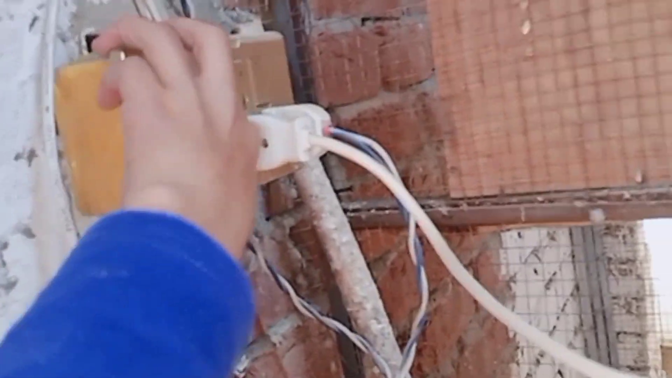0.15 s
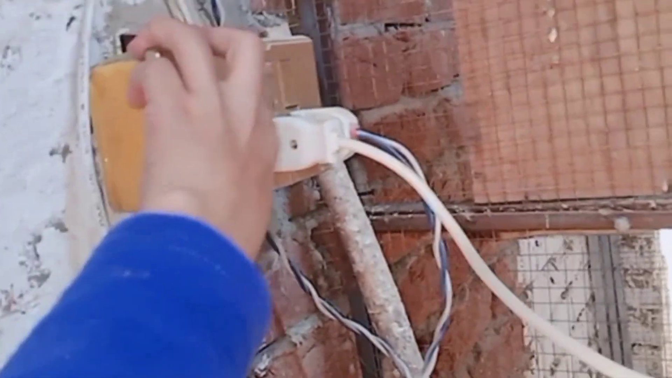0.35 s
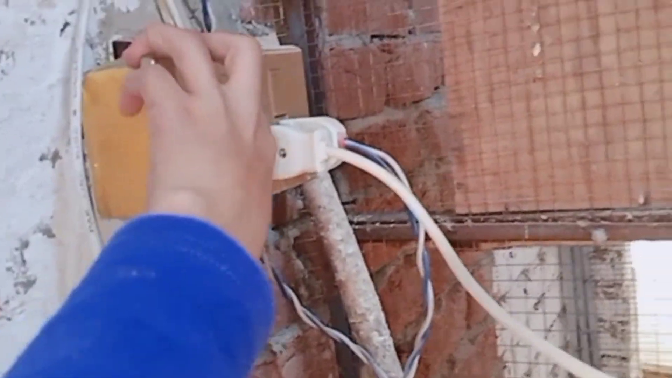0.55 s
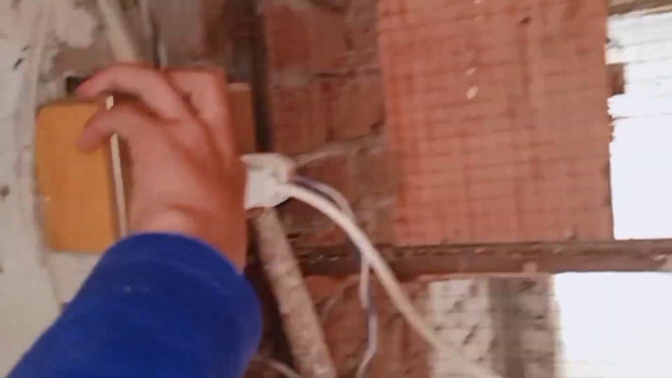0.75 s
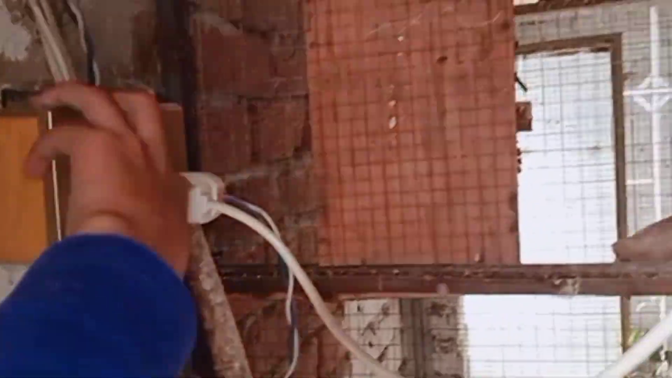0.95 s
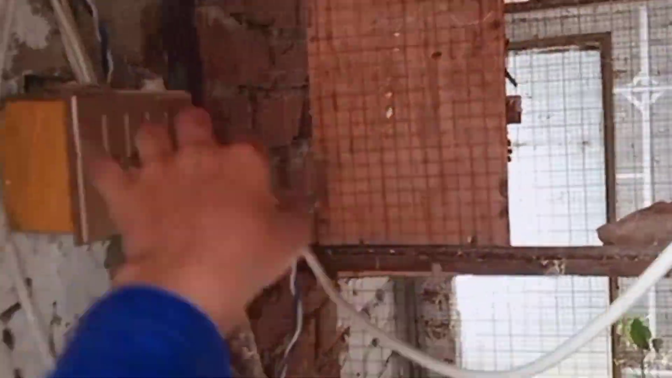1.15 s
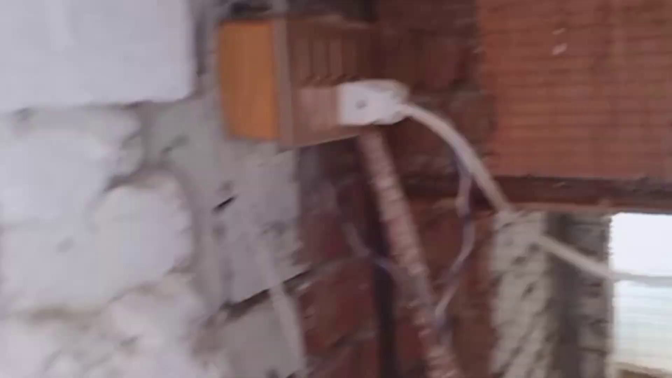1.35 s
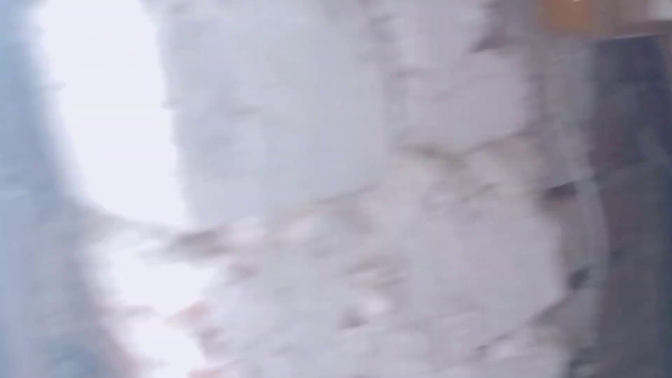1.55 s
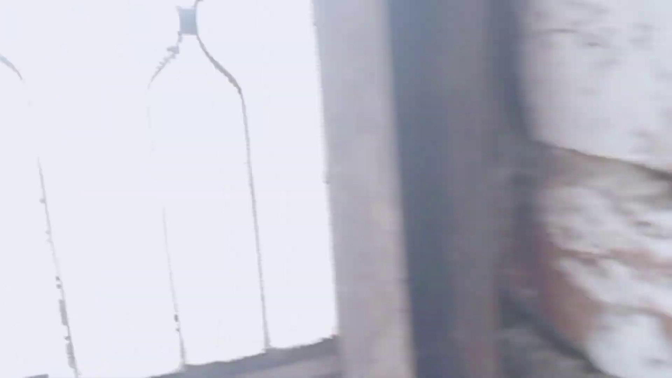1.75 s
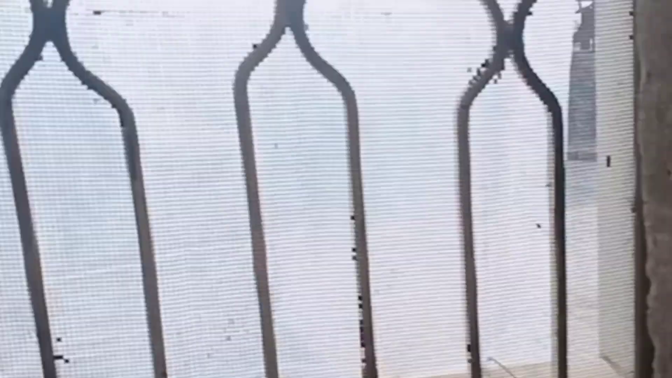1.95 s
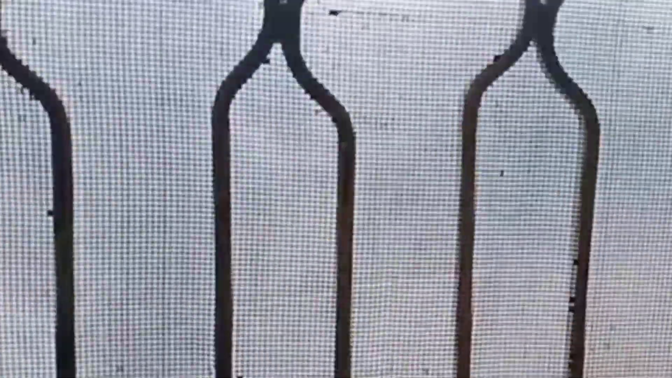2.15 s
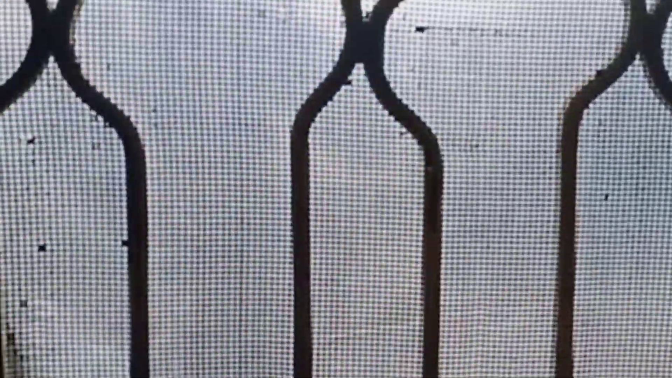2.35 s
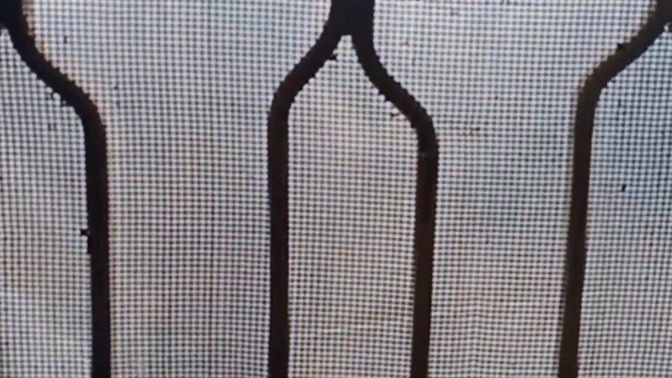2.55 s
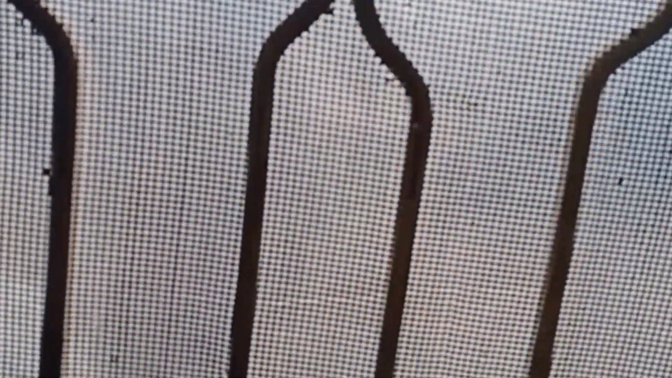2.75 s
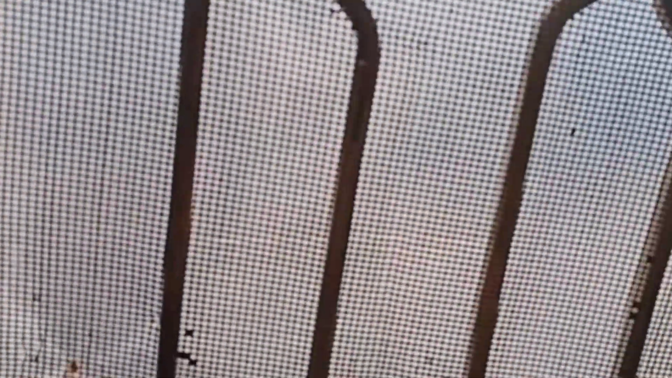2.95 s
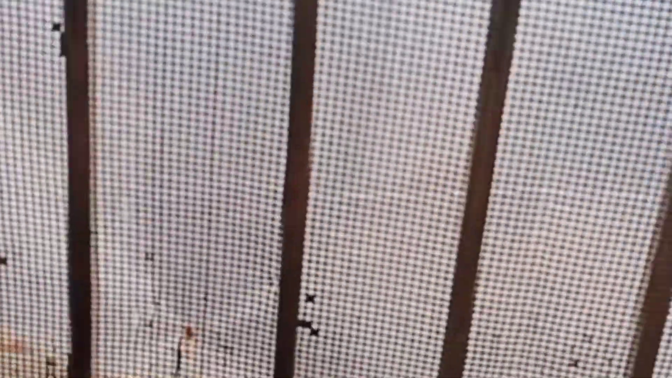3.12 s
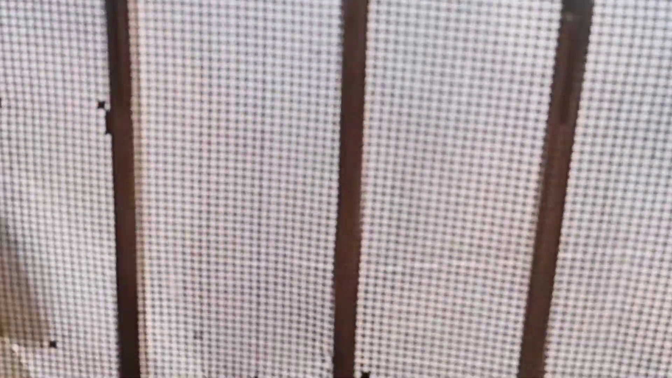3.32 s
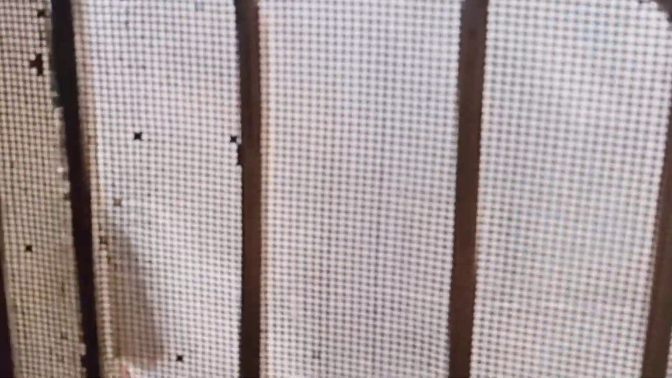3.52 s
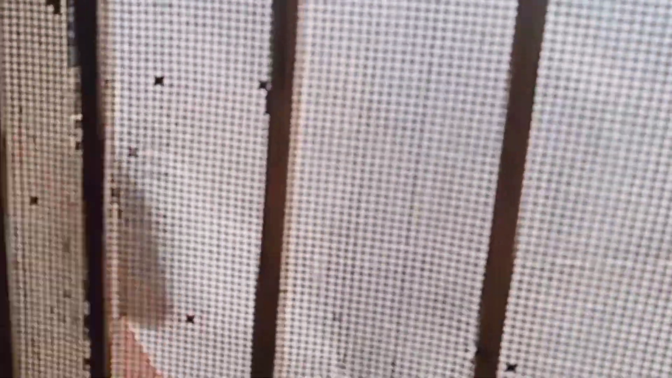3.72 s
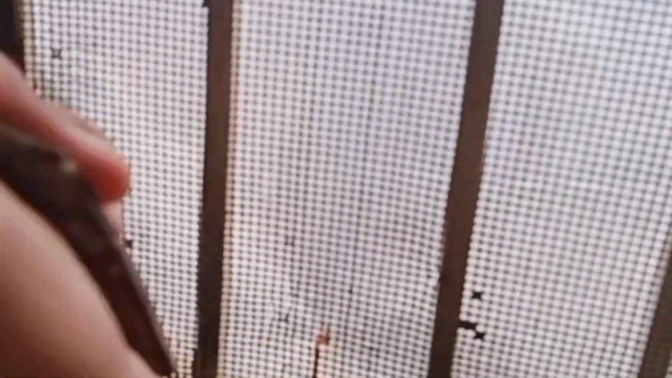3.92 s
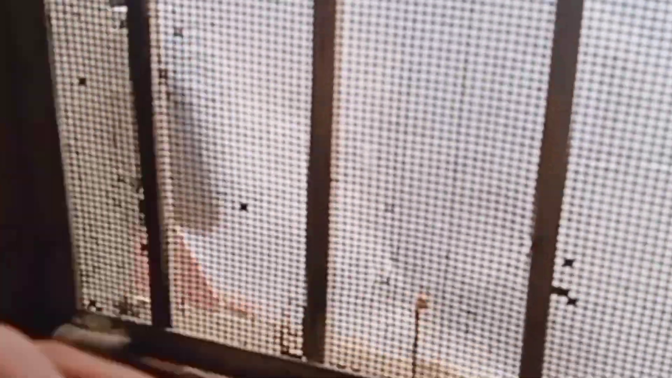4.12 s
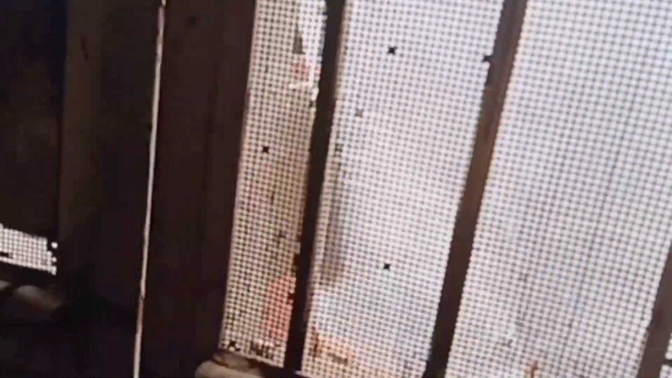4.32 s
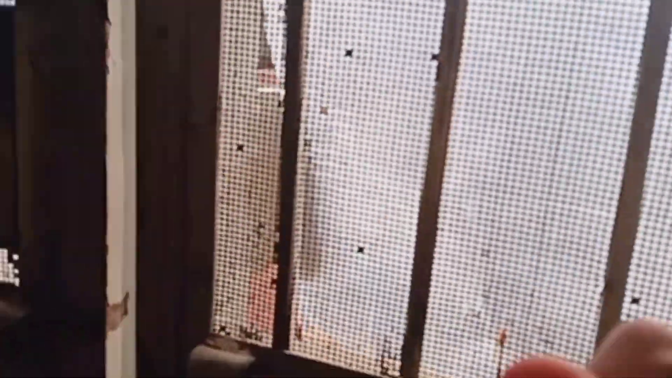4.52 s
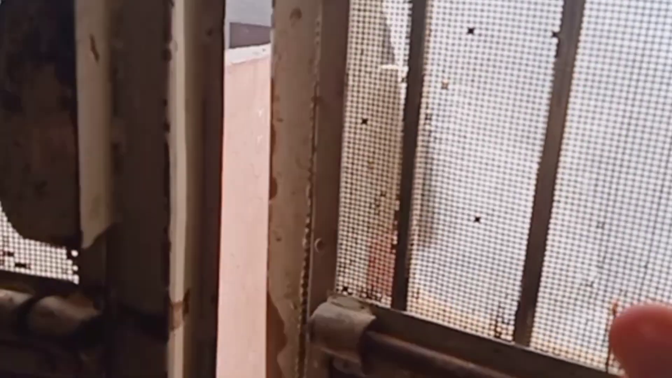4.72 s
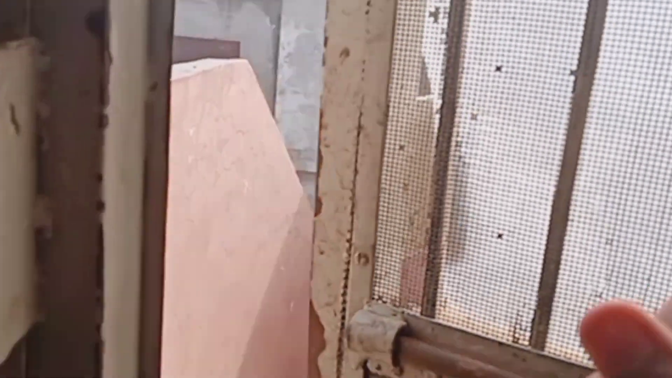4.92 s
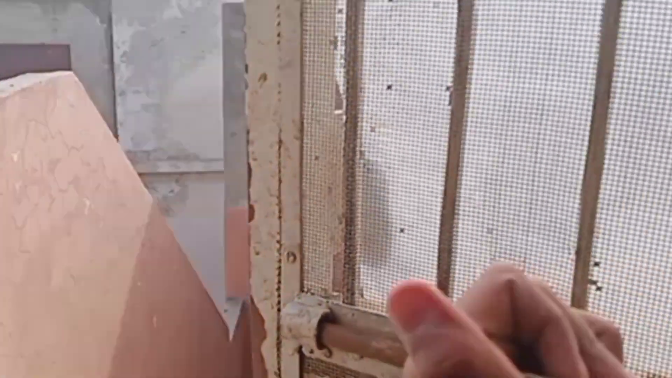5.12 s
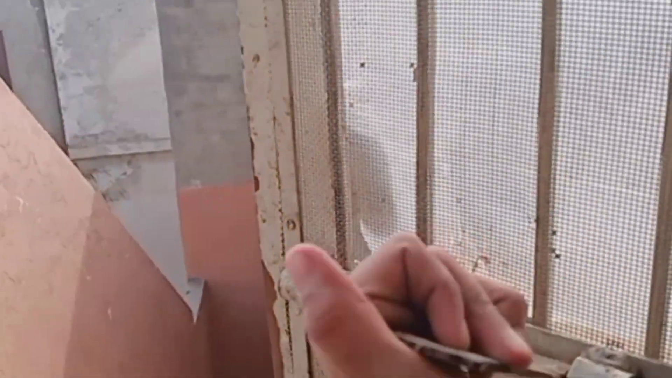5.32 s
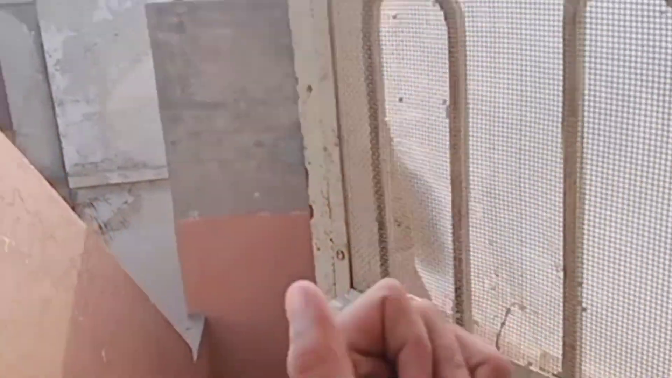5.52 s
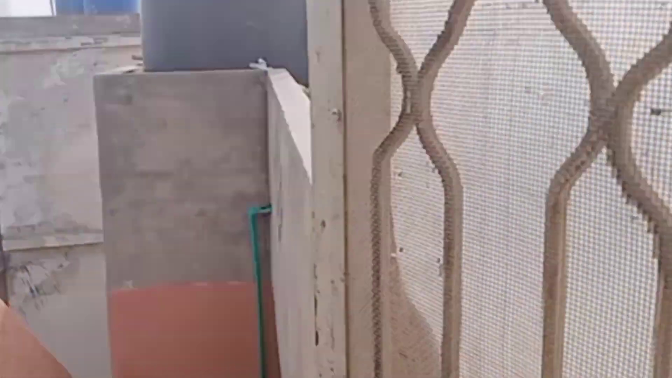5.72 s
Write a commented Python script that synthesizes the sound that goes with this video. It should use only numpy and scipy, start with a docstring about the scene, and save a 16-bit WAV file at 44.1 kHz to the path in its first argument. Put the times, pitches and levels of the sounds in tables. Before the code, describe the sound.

A quiet opening has dry plastic clicks, falling bird whistles and a faint squeak over distant town rumble. From the middle, rusty metal is jiggled right beside the phone: dense rattles, scrapes, dull thumps and shrill stick-slip squeaks with a short reflective echo. Rising hinge squeaks follow, then a thin sustained squeal and a weak low creak as the door settles.

```python
"""A rusty bolt is worked loose and an iron door swings open, heard close by with a phone in hand at a rooftop coop.
Dense rust clicks ring the iron as knocks and scrapes, after two switch snaps; decaying sines make the thumps.
Bolt and hinge squeak by stick-slip, as tones with overtones. Cloth and feathers rustle as faint filtered clicks.
Sparrows chirp as gliding whistles, and nearby walls echo. A low hum comes and goes in bursts over the town's
rumble and murmur, all three made of shaped noise."""
import sys
import numpy as np
from scipy import signal
from scipy.fft import rfft, irfft
from scipy.io import wavfile
from scipy.ndimage import uniform_filter1d

SR = 44100
rng = np.random.default_rng(int(sys.argv[2]) if len(sys.argv) > 2 else 0)


def int16_out(signal):
    """Quantize to a 16-bit WAV file."""
    q = np.round(np.clip(np.atleast_2d(signal).T, -1, 1) * 32767)
    wavfile.write(sys.argv[1], SR, q.astype(np.int16))


N = 258867
TIME = np.arange(N) / SR
PORT_LAG = 14  # samples by which sound reaches the left microphone port later
TOP_HZ = 15900  # upper edge of the phone's pickup


def undb(db):
    """Turn decibels into an amplitude factor."""
    return 10 ** (np.asarray(db) / 20)


def unit(x):
    """Scale to rms 1."""
    return x / np.sqrt(np.mean(x ** 2))


def band(x, hz, width_hz):
    """Resonance with gain 1 at its centre."""
    return signal.lfilter(*signal.iirpeak(hz, hz / width_hz, SR), x)


def double_band(x, hz, width_hz):
    """The same resonance passed twice, for steeper flanks."""
    return band(band(x, hz, width_hz), hz, width_hz)


def walk(rate, count):
    """Random levels held 1 / rate s and smoothed; spread near 1."""
    k = max(int(SR / rate), 2)
    held = np.repeat(rng.standard_normal(count // k + 1), k)
    return 1.28 * uniform_filter1d(held, k)[:count]


def ports(x, pan_db, lag=PORT_LAG):
    """Direct sound at the left and right microphone ports; lag in samples delays the left."""
    left = np.roll(x, lag) * undb(pan_db / 2)
    right = x * undb(-pan_db / 2)
    return np.array([left, right])


def walls(x):
    """Near walls: a short, dense, decaying echo, unrelated at the two ports."""
    t60_s, echo_db = .13, -0.5
    t = TIME[:SR // 2]
    onset = np.minimum(t / 0.00043, 1)
    tail = rng.standard_normal((2, len(t))) * undb(-60 * t / t60_s) * onset
    tail /= np.sqrt(np.sum(tail ** 2, axis=1, keepdims=True))
    return undb(echo_db) * signal.fftconvolve(x, tail, axes=1)[:, :N]


def town_and_hum():
    """A low hum in bursts over the town's rumble and murmur, whose treble is less alike at the two ports."""
    # course of the low hum, rumble and murmur: (time [s], hum level [dB], rumble level [dB], murmur level [dB])
    course = [(0.0, -71, -66.5, -54), (0.73, -67.5, -49.5, -61.5), (1.67, -62.5, -63, -59.5),
              (2.6, -36.5, -48.5, -53.5), (2.91, -70, -57, -58), (3.06, -40, -36, -42),
              (3.24, -51.5, -54.5, -56.5), (3.64, -29, -36.5, -44.5), (3.74, -46, -45.5, -44),
              (3.89, -33, -64, -47.5), (4.12, -48, -53, -59), (4.22, -38, -43.5, -60), (4.3, -71, -55, -38),
              (4.45, -32.5, -28, -59.5), (4.76, -28.5, -49, -47.5), (4.97, -41.5, -50.5, -54),
              (5.4, -31, -42.5, -62), (5.87, -41, -38.5, -45)]
    # relative noise spectrum of rumble and murmur: (frequency [Hz], level [dB])
    spectrum = [(18, -48), (30, -21), (98, 16), (394, -3.5), (512, -1), (616, -14.5), (1130, -18.5),
                (2480, -20), (5040, -43.5), (7470, -20), (8980, -44), (13700, -50), (16000, -54)]
    hum_hz, hum_width_hz = 97, 11
    patchy_db = 5  # each band of the murmur wavers on its own
    s, *columns = np.transpose(course)
    hum_db, rumble_db, murmur_db = (np.interp(TIME, s, c) for c in columns)

    hz = np.maximum(np.fft.rfftfreq(N, 1 / SR), 1)
    spectrum_hz, spectrum_db = np.transpose(spectrum)
    colour = undb(np.interp(np.log(hz), np.log(spectrum_hz), spectrum_db))
    side_width = np.clip(hz / 620.0, .6, 1)
    mid, side = (rfft(rng.standard_normal(N)) * colour * w for w in (1, side_width))
    pair = mid + side * np.array([[1], [-1]])
    low = 1 / (1 + (hz / 350) ** 4)  # splits rumble from murmur

    rumble_flicker_db, murmur_flicker_db = [3 * walk(10, count=N) for _ in range(2)]
    rumble = unit(irfft(pair * low / (1 + (125 / hz) ** 2), N))
    rumble = rumble * undb(rumble_db + rumble_flicker_db + np.array([[-4.0], [3.0]]))

    murmur = np.zeros((2, N))
    for centre_hz in 350 * 2 ** np.arange(0, 5.5, .4):
        bell = np.exp(-(np.log2(hz / centre_hz) / .3) ** 2)
        murmur += irfft(pair * (1 - low) * bell, N) * undb(patchy_db * walk(14, count=N))
    murmur = unit(murmur) * undb(murmur_db + murmur_flicker_db + 5.0)

    hum = band(rng.standard_normal(N), hum_hz, hum_width_hz)
    hum = unit(band(hum, hum_hz, 4 * hum_width_hz))
    return rumble + murmur + hum * undb(hum_db + np.array([[-3.5], [2.0]]))


def sparrows():
    """Short, mostly falling whistles, a little hoarse from a trembling pitch, with a weak octave."""
    # chirps: (time [s], length [s], start pitch [Hz], end pitch [Hz], level [dB])
    chirps = [(0.282, 0.057, 2750, 2035, -49), (0.13, 0.069, 2890, 2515, -43),
              (0.451, 0.081, 1856, 1795, -47), (0.324, 0.016, 3030, 2920, -40.5),
              (0.59, 0.15, 2140, 2170, -39), (1.048, 0.019, 2520, 2440, -46.5),
              (1.131, 0.038, 3020, 2050, -41), (1.132, 0.042, 4200, 3780, -40.5),
              (1.169, 0.088, 3594, 2476, -38), (1.301, 0.061, 3005, 2640, -38.5),
              (1.621, 0.046, 2270, 2150, -46.5), (1.695, 0.05, 2495, 2680, -47.5),
              (1.881, 0.056, 2480, 2463, -42.5), (2.01, 0.046, 3640, 2430, -55.5),
              (2.148, 0.073, 3260, 2280, -49.5)]
    out = np.zeros(N)
    for s, length, start_hz, end_hz, db in chirps:
        i, n = int(s * SR), int(length * SR)
        x = np.arange(n) / n
        hz = (start_hz + (end_hz - start_hz) * x) * (1 + .035 * walk(500, count=n))
        phase = 2 * np.pi * np.cumsum(hz) / SR
        swell = np.sin(np.pi * x ** 0.57)  # peaks before the middle
        out[i:i + n] += undb(db) * swell * (np.sin(phase) + 0.18 * np.sin(2 * phase))
    return ports(out, 0)


def grit(spread_db):
    """Dense rust clicks of very uneven size, coming in clumps."""
    size = np.minimum(rng.exponential(size=N), 7)
    return unit(rng.standard_normal(N) * undb(spread_db * size + 2.5 * walk(250, count=N)))


def iron(clicks):
    """Clicks ring the door: low body, lower frame, upper frame and bright grit, each at rms 1."""
    # resonances of the iron door: (frequency [Hz], half-width [Hz], relative level [dB])
    resonances = [(704, 420, 0.5), (2140, 108, 7), (2541, 194, 0), (2700, 64, 7), (3890, 560, -3),
                  (4520, 1520, -3), (7164, 690, -5.5), (7640, 1730, -9.5), (11680, 3220, 0)]
    # the contact wanders, so every resonance swells and fades on its own
    sway_db = 2.5
    rung = []
    for hz, half_width_hz, db in resonances:
        level = undb(db + sway_db * walk(60, count=N))
        rung.append(level * double_band(clicks, hz, 2 * half_width_hz))
    return [unit(sum(part)) for part in (rung[:2], rung[2:6], rung[6:8], rung[8:])]


def rustle():
    """Cloth and feathers rustle faintly near the phone: clicks through the three brighter parts."""
    # course of the rustle: (time [s], level [dB])
    rustle_levels = [(0, -80), (.5, -65), (.83, -36), (.95, -53), (1.27, -43), (1.4, -47), (1.44, -85.5),
                     (1.82, -56.5), (1.97, -56), (2.22, -54.5), (2.3, -32), (2.48, -39.5), (2.52, -79),
                     (2.74, -58), (2.8, -40), (2.83, -99)]
    _, frame, upper, top = iron(grit(spread_db=6.0))
    level = undb(np.interp(TIME, *np.transpose(rustle_levels)) + 4.3 * walk(12, count=N))
    return ports(level * (upper + undb(-6.0) * frame + undb(-11.5) * top), 0)


def thumps():
    """The door thumps: decaying sines, stronger at the right port."""
    # thumps: (time [s], level [dB], pitch [Hz], time to fall by 60 dB [s])
    thump_table = [(.394, -41, 875, 0.13), (3.559, -9.5, 161, 0.038), (4.09, -33.5, 183, 0.046),
                   (4.336, -20.5, 303, 0.043), (4.523, -20, 106, 0.05)]
    out = np.zeros((2, N))
    for s, db, hz, t60 in thump_table:
        i = int(s * SR)
        t = TIME[:SR // 4]
        thump = undb(db - 60 * t / max(t60, .01)) * np.sin(2 * np.pi * hz * t)
        out[:, i:i + len(t)] += ports(thump, -10.0)
    return out


def knocks():
    """Each contact swells, holds and dies away through the door, coloured by the spot that is touched."""
    # snaps, knocks and rust scrapes: (time [s], rise [s], hold [s], time to fall by 60 dB [s],
    # level [dB], brightness [dB], contact ring [Hz])
    contacts = [(.094, 0.00082, .001, 0.066, -27.5, 6, 1700),
                (.648, 0.00037, 0.0016, 0.021, -25.5, 6, 1640), (0.752, 0.012, 0.11, 0.13, -34, 6, 4580),
                (1.376, 0.0081, 0.0097, .15, -39, -4.5, 3030),
                (2.264, 0.083, 0.024, 0.094, -24.5, -6.5, 1874), (2.413, .0025, 0.041, 0.1, -63, 13, 6860),
                (2.453, 0.0023, 0.0063, 0.032, -40.5, 1, 7400),
                (2.653, 0.002, 0.0031, 0.26, -39.5, -2.5, 3560), (2.8, 0.0013, 0.029, 0.22, -36, 10, 2390),
                (2.83, 0.0034, 0.058, 0.26, -22.5, 0, 3170), (2.952, 0.027, 0.012, 0.18, -21, -7.5, 2410),
                (2.981, 0.0015, 0.0086, 0.048, -20.5, 5.5, 2490),
                (3.012, 0.00071, 0.0064, .13, -16.5, -5, 3610),
                (3.085, 0.013, 0.085, 0.062, -32.5, -1.5, 3200),
                (3.213, 0.00088, 0.019, 0.073, -20.5, 0, 3840), (3.261, .004, 0.02, 0.13, -47, -11.5, 8300),
                (3.332, 0.011, 0.038, 0.11, -36, -1, 7600), (3.393, 0.013, 0.021, 0.15, -30.5, -8, 2220),
                (3.475, 0.00091, 0.012, 0.69, -36, -1.5, 3180),
                (3.614, 0.0021, 0.0038, 0.19, -22, -1.5, 3460),
                (3.764, 0.0034, .003, 0.044, -32.5, -6, 4160),
                (3.793, 0.0029, 0.0076, 0.015, -30.5, -4.5, 2690),
                (3.91, 0.0034, 0.029, 0.21, -29.5, -0.5, 3650),
                (4.058, .0016, 0.018, 0.14, -39, -2.5, 7260), (4.13, 0.012, .009, 0.033, -19, 4.5, 3010),
                (4.171, .0045, .012, 0.26, -26, -6, 2540), (4.222, 0.011, 0.017, 0.054, -20, 4.5, 3920),
                (4.27, .002, 0.0042, 0.088, -20, -3, 3130), (4.299, 0.026, 0.031, 0.056, -22, 4, 2500),
                (4.335, 0.0015, 0.037, 0.59, -22, -7, 1310),
                (4.435, 0.016, 0.0059, 0.024, -25.5, 7.5, 4200),
                (4.576, 0.0023, 0.0044, 0.017, -48.5, 9.5, 3070),
                (4.768, 0.0039, 0.056, 0.32, -44, 3.5, 3970), (4.823, 0.015, 0.025, 0.18, -33, 11, 4400),
                (4.87, 0.018, 0.0088, .21, -28, 2.5, 4650),
                (5.047, 0.00096, 0.0008, 0.014, -34.5, -5, 1970),
                (5.099, 0.04, 0.013, 0.26, -27.5, 3.5, 4060), (5.206, 0.03, 0.021, 0.21, -24.5, 5.5, 5350),
                (5.312, 0.0077, 0.011, 0.21, -26.5, 4, 5380), (5.44, 0.032, 0.024, 0.23, -35, 6, 4750),
                (5.788, .067, .055, .1, -39, -2, 2280)]
    # body, frame, upper frame, grit: level, and dB gained per dB of brightness
    part_db, part_slope = np.array([-14.5, -1, -3, -9]), np.array([-1.72, 0.23, 0.99, 1.2])
    # narrow rings scattered around the touched spot: level, scatter of log pitch, width as share of pitch
    rasp_db, rasp_spread, rasp_width = 1.5, 0.4455, 0.027
    # a contact starts with a bare tick, weaker the slower it rises
    tick_db, tick_s, sharp_s = 24, .0005, .002
    stutter_db = 3.5  # rust catches and lets go within a scrape

    clicks = grit(spread_db=3.8)
    # the door is wide: its four parts reach the ports with different lags
    parts = [ports(part, 0, lag) for part, lag in zip(iron(clicks), (20, 12, 17, 9))]
    out = np.zeros((2, N))
    scatter = np.exp(rasp_spread * np.clip(rng.standard_normal((len(contacts), 6)), -2, 1.5))
    for (s, rise, hold, t60, db, bright_db, hz), ratios in zip(contacts, scatter):
        i = int(s * SR)
        t = TIME[:min(SR // 2, N - i)]
        n = len(t)
        at = slice(i, i + n)
        shape = np.minimum(t / rise, 1) * undb(-60 * np.maximum(t - rise - hold, 0) / t60)
        shape *= 1 + 0.88 * np.exp(-t / 0.0034)  # the first touch cracks
        shape *= undb(stutter_db * walk(40.3, count=n) * np.minimum(t / 0.021, 1))

        tick = band(np.sign(rng.standard_normal(n)), 4500.0, 8000.)
        tick = tick * np.exp(-t / tick_s - rise / sharp_s)
        out[:, at] += ports(undb(db + tick_db) * tick, 0)

        spot = ports(3.5 * double_band(clicks[at], hz, .3 * hz), 0)
        rasp = np.zeros(n)
        for ring_hz in np.minimum(hz * ratios, TOP_HZ):
            ring = band(clicks[at], ring_hz, rasp_width * ring_hz)
            rasp += undb(6.24 * walk(48.3, count=n)) * ring
        spot = spot + ports(undb(rasp_db) * rasp, 0, lag=16)

        gains = undb(part_db + bright_db * part_slope)
        rung = sum(gain * part[:, at] for gain, part in zip(gains, parts))
        out[:, at] += undb(db) * shape * (spot + rung)
    return out


def slip(hz, db, second_db):
    """Regular stick-slip: a tone with overtones whose rate trembles and whose grip throbs."""
    n = len(hz)
    t = TIME[:n]
    short = min(0.087 * SR / n, 1)  # brief slips are rougher than long sings
    # slips in this range lock onto a ringing bar and stay clean
    tremble = .003 if 4500 < hz.min() < 5700 else .022
    phase = 2 * np.pi * np.cumsum(hz * (1 + tremble * short * walk(400, count=n))) / SR
    # overtones too high for the phone are left out
    tone = undb(db) * np.sin(phase)
    tone += undb(second_db) * np.sin(2 * phase) * (2 * hz.max() < TOP_HZ + 900)
    tone += undb(second_db - 12.0) * np.sin(3 * phase) * (3 * hz.max() < TOP_HZ)
    edge = np.clip(np.minimum(t, t[-1] - t) / 0.00083, 0, 1)
    throb = undb(3.5 * short * walk(140, count=n))
    return np.sqrt(2) * tone * edge * throb


def squeaks():
    """Squeaks swell and fade as their rate settles; a long squeal sounds near the end, low squeaks under it."""
    # bolt and hinge squeaks: (time [s], rise [s], fall [s], start rate [Hz], settled rate [Hz],
    # peak level [dB], second partial relative to the first [dB])
    squeak_table = [(.76, 0.013, .12, 2257, 2360, -28.5, -1), (.785, 0.017, 0.085, 6360, 6160, -27, -30),
                    (.79, .03, .06, 4500, 4620, -23, -30), (.84, 0.052, 0.15, 3760, 3693, -22.5, -6),
                    (2.33, 0.023, 0.026, 1655, 1910, -20.5, -24),
                    (2.401, 0.0048, 0.062, 6734, 6510, -14, -3),
                    (2.461, 0.0037, 0.02, 7600, 7370, -12.5, -11),
                    (2.875, 0.02, 0.069, 2272, 2248, -17.5, 5),
                    (3.029, 0.02, 0.049, 2965, 2750, -20.5, -33), (3.1, 0.025, .055, 1584, 1986, -19, -27),
                    (3.17, 0.0091, 0.0099, 5016, 4900, -6.5, -18.5),
                    (3.277, 0.0094, 0.017, 8340, 8730, -11.5, -40),
                    (3.29, 0.004, 0.033, 7300, 7460, -9.5, -19),
                    (3.351, 0.0096, 0.015, 7260, 7120, -12.5, -38),
                    (3.35, 0.01, 0.047, 4570, 4570, -16.5, -13.5),
                    (3.41, 0.0057, 0.027, 4950, 5000, -16, -42), (3.591, 0.016, .02, 6430, 6600, -24, -30),
                    (3.631, .016, 0.068, 2684, 2890, -21.5, -18),
                    (3.662, 0.0045, 0.033, 4794, 5130, -2.5, -13.5),
                    (3.806, 0.0032, 0.051, 7870, 7780, -6, -27),
                    (3.819, 0.016, 0.048, 7250, 7200, -23, -19), (3.918, 0.014, .03, 6770, 6800, -23, -30),
                    (3.927, 0.012, .03, 4974, 5034, -3, -18), (3.95, 0.013, 0.013, 4950, 4964, -3.5, -17.5),
                    (3.975, 0.014, 0.022, 4900, 4930, -13.5, -9.5),
                    (4.058, 0.0057, 0.0082, 7080, 7030, -3.5, -13),
                    (4.075, 0.027, 0.042, 7200, 7480, -17, -18),
                    (4.085, 0.0061, 0.028, 7440, 8210, -8, -17), (4.129, 0.019, 0.066, 1430, 1410, -22, -7),
                    (4.215, 0.028, 0.051, 1366, 1332, -19.5, -17),
                    (4.225, 0.0267, 0.014, 2390, 2330, -19.5, -32),
                    (4.29, 0.021, 0.01, 1610, 1515, -17, -10.5), (4.945, 0.035, .03, 3360, 3660, -18.5, -9),
                    (4.992, 0.0047, 0.095, 3604, 3590, -17, -10),
                    (5.1, 0.045, 0.013, 3360, 3610, -26.5, -4), (5.142, 0.018, .1, 4020, 4430, -12, -27),
                    (5.15, 0.027, .05, 4300, 4620, -19, -27), (5.228, 0.026, 0.052, 3860, 4375, -18, -23),
                    (5.235, .02, 0.052, 4700, 5100, -18.5, -30),
                    (5.33, 0.016, 0.069, 5300, 5900, -20.5, -30),
                    (5.322, 0.014, 0.079, 4275, 5410, -14, -36),
                    (5.66, 0.044, 0.037, 1675, 1705, -35.5, -36), (5.709, 0.16, .1, 994, 1006, -40.5, -6)]
    # long squeal of the swinging hinge: (time [s], slip rate [Hz], level [dB], second partial level [dB])
    squeal = [(5.46, 5519, -41.5, -64), (5.474, 5491, -24.5, -16.5), (5.586, 5490, -16.5, -11),
              (5.614, 5493, -36, -15), (5.636, 5466, -20, -17), (5.668, 5470, -16, -22),
              (5.756, 5462, -25.5, -32), (5.822, 5462, -43, -75), (5.84, 5469, -53, -67)]
    start_db, end_db = -8, -29  # a squeak starts and ends this far under its peak
    settle_s = .014  # time constant with which the slip rate settles
    out = np.zeros(N)
    for s, rise, fall, start_hz, end_hz, peak_db, second_db in squeak_table:
        i = int(s * SR)
        t = TIME[:min(int((rise + fall) * SR), N - i)]
        db = peak_db + np.interp(t, [0, rise, rise + fall], [start_db, 0, end_db])
        hz = end_hz + (start_hz - end_hz) * np.exp(-t / settle_s)
        out[i:i + len(t)] += slip(hz, db, db + second_db)
    s, *columns = np.transpose(squeal)
    i, j = int(s[0] * SR), int(s[-1] * SR)
    out[i:j] += slip(*(np.interp(TIME[i:j], s, c) for c in columns))
    return ports(out, -2.1)


def scene():
    """Close sounds and their echo shift sides as the phone turns; the whole level dips briefly once."""
    # the phone turns with the hand: (time [s], balance setting, half added left and half taken right [dB])
    turn = [(0, -1.5), (1.6, 0.5), (2.6, -3.5), (3.6, -1), (5.0, -2.5), (5.7, 6), (5.87, -7)]
    dip_s, dip_width_s, dip_db = 2.785, .016, -25
    background, birds = town_and_hum(), sparrows()
    near = rustle() + thumps() + knocks()
    slips = squeaks()
    # squeaks reach the walls weaker than knocks
    echo = walls(near + undb(-5) * slips + undb(1.0) * birds)
    close = near + slips + birds + echo
    turn_db = np.interp(TIME, *np.transpose(turn))
    sound = close * undb(np.array([turn_db, -turn_db]) / 2) + background
    return sound * undb(dip_db * np.exp(-((TIME - dip_s) / dip_width_s) ** 2))


def record(dry):
    """The phone thins the deep bass, rounds the loudest peaks and cuts the top steeply."""
    bass_cut = signal.butter(3, 65., "high", fs=SR, output="sos")
    thin = signal.sosfilt(bass_cut, dry)
    rounded = .62 * np.tanh(thin / .62)
    top_cut = signal.ellip(10, .2, 70, TOP_HZ, fs=SR, output="sos")
    return signal.sosfilt(top_cut, rounded)


dry = scene()
out = record(dry)
int16_out(out)
```